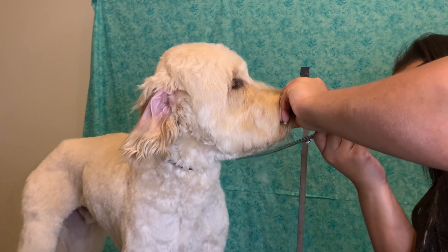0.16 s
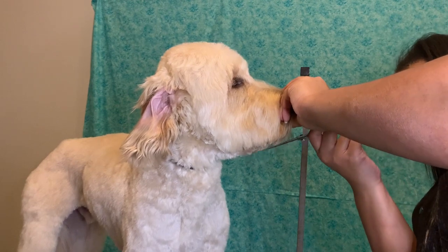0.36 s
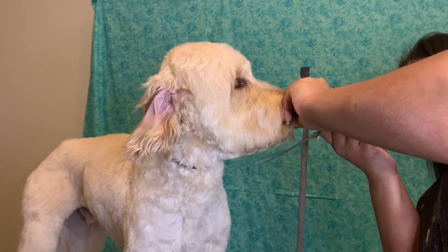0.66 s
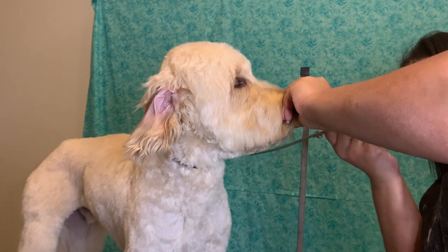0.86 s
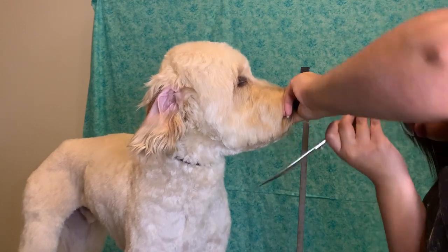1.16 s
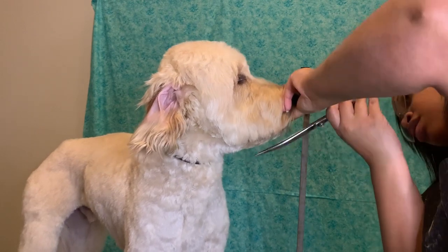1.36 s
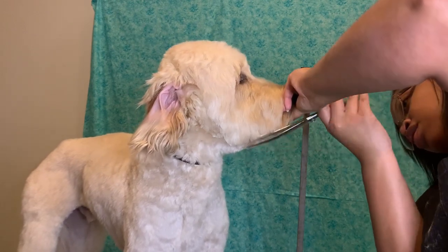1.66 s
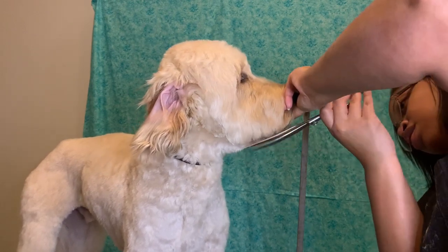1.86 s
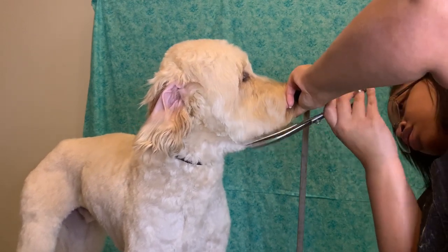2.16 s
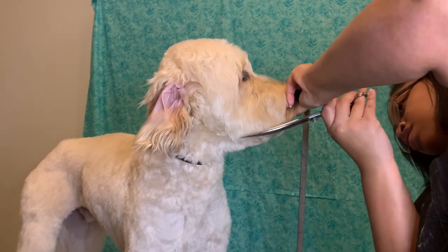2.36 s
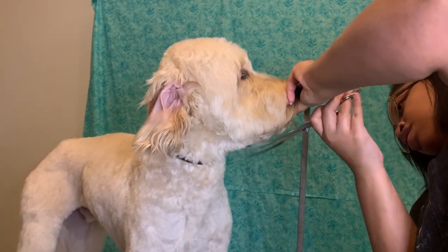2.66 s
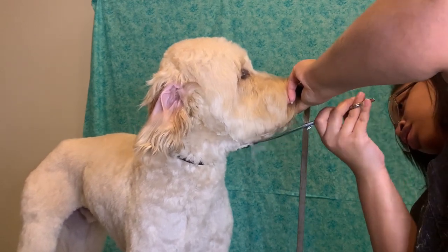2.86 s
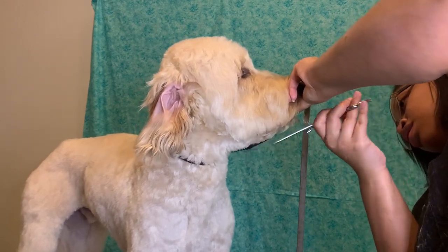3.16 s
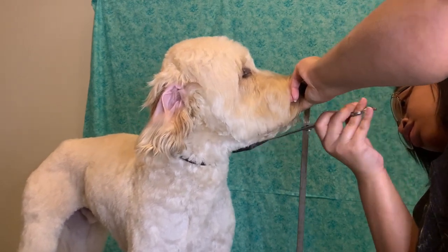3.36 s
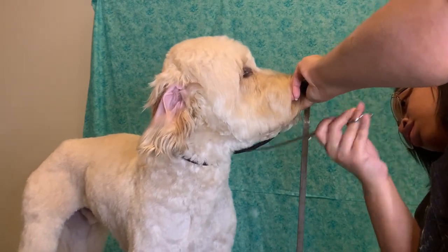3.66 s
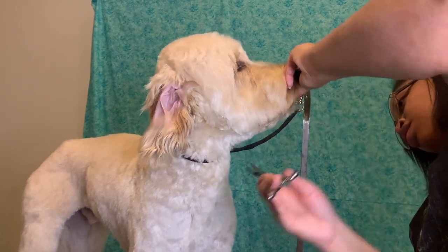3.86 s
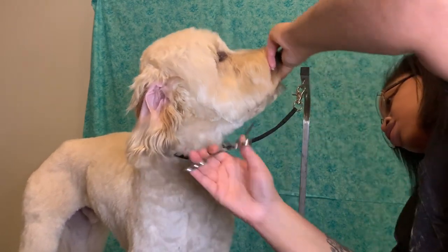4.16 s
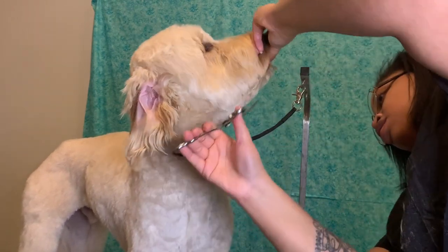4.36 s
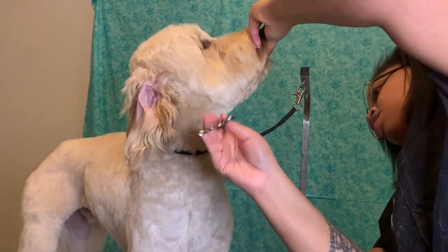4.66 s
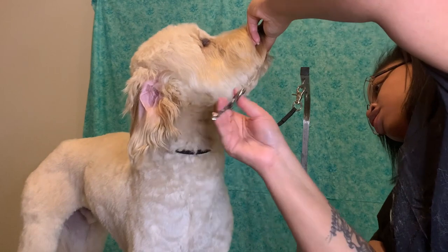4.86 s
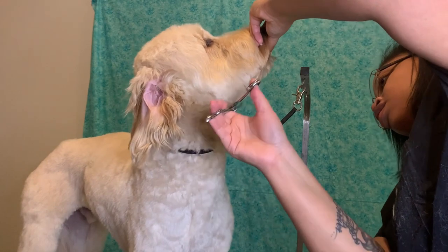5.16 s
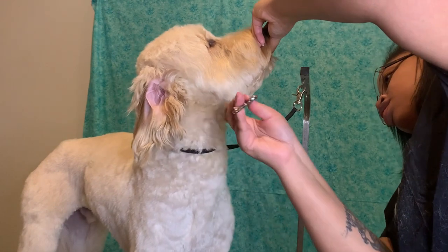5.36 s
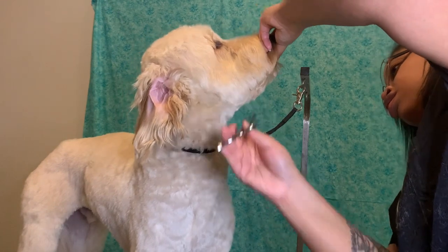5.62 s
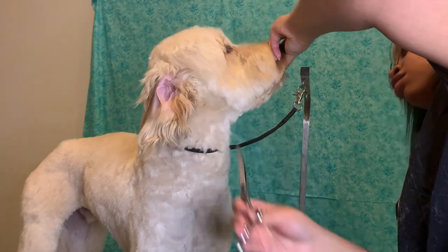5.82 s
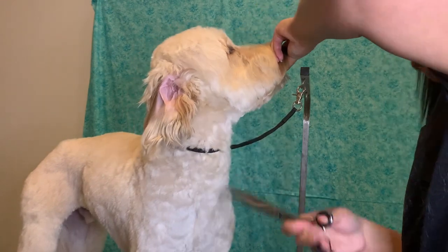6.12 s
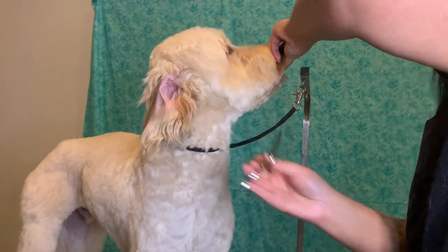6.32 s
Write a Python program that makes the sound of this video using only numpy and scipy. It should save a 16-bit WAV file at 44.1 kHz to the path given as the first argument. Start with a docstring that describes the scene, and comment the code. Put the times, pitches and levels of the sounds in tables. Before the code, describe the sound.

Close stereo sound of steel grooming shears cutting a dog's hair in a small, hard-walled room with a short bright reverb. Crisp snips with ringing clacks land at about 0.1 and 0.4 seconds, followed by lighter, dry ticking cuts and a softer closure near 0.8. Fine scratchy clips continue through 1.5, then firmer snips at 1.7, 2.0 and 2.5. Tiny pivot squeaks flick by near 2.8 and 3.3, around hard snips at 3.0 and 3.5. At 4.0 a sharp clip meets a soft rustle of hand against fur. The strongest, brightest snips ring at 4.5 and 4.9, with a weaker one at 5.3. Afterwards only sparse faint clicks remain, with light fur brushing around 5.8 to 6.0 and again near 6.45. Quiet low rumble, bassy ventilation and a faint wavering hum lie underneath throughout.

```python
"""Steel grooming shears work along a dog's chin and throat in a small hard-walled room.
Hair snapping between the blades excites their resonances; the handles clack shut as impacts ring the tool;
the pivot squeals by stick-slip. Shaped noise gives the hand in the coat, a low rumble and ventilation, with a hum.
Reflections and decaying diffuse sound answer; two close ports differ in phase, which combs the treble of their sum."""
import sys
import numpy as np
from scipy import signal
from scipy.fft import rfft, irfft, next_fast_len
from scipy.io import wavfile

SR = 44100
rng = np.random.default_rng(int(sys.argv[2]) if len(sys.argv) > 2 else 0)


def wrap_up_sound(samples):
    """Save the sound to the file named by the first command line argument, as 16-bit audio."""
    columns = np.atleast_2d(samples).T
    # keep every value between -1 and 1, then stretch to whole-number steps
    tamed = np.clip(columns, -1, 1)
    steps = np.round(tamed * 32767).astype(np.int16)
    wavfile.write(sys.argv[1], SR, steps)


N = 286209
SIZE = next_fast_len(N + SR)   # transform length with space for the room's decay
HZ = np.arange(1, SIZE // 2 + 2) * SR / SIZE   # bin frequencies, one bin up so that log f exists

# Resonances along the shears, from the handle side to the point: f/Hz, width/Hz, level/dB
HEEL_MODES = [(1502, 516, -7), (2133, 510, 10.5), (2163, 820, 6.5)]
SHANK_MODES = [(3740, 1000, -4.5), (4220, 1200, -5.5)]
BELLY_MODES = [(5100, 140, -11), (6242, 750, -4), (7110, 656, -1)]
EDGE_MODES = [(8257, 1240, -7), (8447, 752, 3.5), (9080, 2300, -1), (10760, 2310, -2), (11870, 670, -6)]
TIP_MODES = [(12800, 610, -0.91), (14450, 1700, -0.65), (14160, 1200, 0.96)]


def from_db(db):
    """Level and amplitude: 20 dB is a tenfold gain."""
    return 10 ** (np.asarray(db) / 20)


def rms_one(x):
    """Normalisation of mean power: scale to rms 1."""
    return x / np.sqrt(np.mean(x ** 2) + 1e-20)


def at_hz(points):
    """Interpolation on a log-frequency axis: a table read at every spectral bin."""
    hz, value = np.array(points)[:, 0], np.array(points)[:, 1]
    return np.interp(np.log(HZ), np.log(hz + 1), value)


def resonate(x, modes):
    """Modal superposition: parallel two-pole resonances of alternating sign."""
    out = 0
    for k, (hz, width_hz, level_db) in enumerate(modes):
        r = np.exp(-np.pi * width_hz / SR)   # pole radius sets the bandwidth
        zeros = [(1 - r * r) / 2, 0, (r * r - 1) / 2]
        poles = [1, -2 * r * np.cos(2 * np.pi * hz / SR), r * r]
        mode = signal.lfilter(zeros, poles, x + 1e-18)
        out = out + (-1) ** k * from_db(level_db) * mode
    return out


def grit(per_s, spread_db):
    """Shot noise: dense random ticks of uneven size and either sign; rms 1."""
    size_db = spread_db * np.minimum(rng.exponential(1, N), 4)
    sizes = from_db(size_db) * rng.choice([-1, 1], N)
    return rms_one(sizes * (rng.random(N) < per_s / SR))


def coloured(spectrum):
    """Spectral shaping: two unrelated noises of one colour; rms 1."""
    white = rfft(rng.standard_normal((2, SIZE)))
    return rms_one(irfft(white * from_db(at_hz(spectrum)), SIZE)[:, :N])


def swells(rows, rise_db_per_s, fall_db_per_s):
    """Exponential growth and decay: each row (full at s, hold s, dB) rises, holds and falls; gains add."""
    t, total = np.arange(N) / SR, 0
    for s, hold, db in rows:
        rise_db = rise_db_per_s * np.maximum(s - t, 0)
        fall_db = fall_db_per_s * np.maximum(t - s - hold, 0)
        total = total + from_db(db - rise_db - fall_db)
    return total


def drift(corner_hz):
    """Low-pass random process: slow chance of spread 1, drawn every 100 samples and interpolated."""
    r = np.exp(-200 * np.pi * corner_hz / SR)
    white = rng.standard_normal(N // 100 + 1002)
    slow = signal.lfilter([1], [1, -2 * r, r * r], white)[1000:]   # drop the filter's start
    return np.interp(np.arange(N) / 100, np.arange(len(slow)), rms_one(slow - slow.mean()))


def hum():
    """Narrow-band noise: one sharp resonance driven at random gives a tone that wavers."""
    hz, width_hz, level_db = 58.7, 2.7, -61.5
    return from_db(level_db) * rms_one(resonate(rng.standard_normal(N), [(hz, width_hz, 0)]))


def ventilation():
    """Stationary broadband noise with most of its energy in the bass."""
    # Relative spectral density of the air noise: f/Hz, level/dB
    air_spectrum = [(20, -55), (33, -20.5), (45, 4), (75, 0.5), (100, -10.5), (160, -16.5), (300, -29.5),
                    (600, -32), (1300, -42.5), (2500, -43), (5000, -46.5), (9000, -39), (16000, -46.5)]
    return from_db(-58) * coloured(air_spectrum)


def rumble():
    """Amplitude-modulated low noise: a slow level course plus a random waver."""
    # Relative spectral density of the rumble: f/Hz, level/dB
    rumble_spectrum = [(40, -21.5), (90, 8), (200, -5), (350, -11.5), (700, -29), (16000, -80)]
    # Slow course of the rumble: t/s, level/dB
    level_course = [(0, -66), (1.2, -65.5), (1.9, -70.5), (3.4, -69.5), (5.002, -66.5), (6.49, -71)]
    waver_db, waver_corner_hz = 3.5, 7.4
    level_db = np.interp(np.arange(N) / SR, *np.transpose(level_course))
    level_db = level_db + waver_db * drift(waver_corner_hz)
    return from_db(level_db) * coloured(rumble_spectrum)


def rustle():
    """Friction noise: hand and arm sweep through the coat, many small contacts merging into noise."""
    # Sweeps through the coat: full at t/s, hold/s, level/dB
    sweeps = [(0, 0.017, -75.5), (1.15, 0.086, -71.5), (2.14, .03, -75), (4.02, .2, -63.5),
              (5.78, 0.29, -71), (6.33, .05, -74), (6.45, 0.038, -64)]
    # Relative spectral density of the brushed fur: f/Hz, level/dB
    fur_spectrum = [(150, -14.5), (500, -0.5), (1000, -0.5), (2500, -1), (5000, -11), (16000, -41.5)]
    return swells(sweeps, rise_db_per_s=155, fall_db_per_s=91.5) * coloured(fur_spectrum)


def squeal():
    """Stick-slip: the pivot, loaded by slowly closing blades, ticks into one narrow resonance."""
    # Moments of greatest load: t/s, peak level/dB
    loads = [(2.819, -42), (3.335, -43)]
    # Resonance of the pivot: f/Hz, width/Hz, level/dB
    pivot_mode = [(8950, 400, 0)]
    load = swells([(s, 0, db) for s, db in loads], rise_db_per_s=1798, fall_db_per_s=317.5)
    ticks = grit(400., spread_db=0.5)
    return load * rms_one(resonate(resonate(ticks, pivot_mode), pivot_mode))


def clacks():
    """Impulse response: a hard blow and three quick rebounds ring the tool, knock in the hand, thud in the table."""
    # Handles meeting their stop: t/s, blow drive level/dB,
    # then drives against it: bright ring/dB, dull knock/dB, sharp knock/dB, thud/dB
    impacts = [(0.0974, -26, 9.5, -12.5, -25, -23), (0.366, -48.5, -5, -9, -14, -14),
               (0.4122, -25, 9, -16, -14.5, -27), (0.8362, -37.5, 2, -10, -13, -12.5),
               (1.6955, -61.5, 19, -23, -20, -25), (2.0354, -30.5, 4, -10.5, -13, -14.5),
               (2.51, -49.5, 13.5, -15, -34, -17.5), (2.7892, -47.5, -3, -12, -11, -30),
               (2.9809, -29.5, 10, -11, -8.5, -15), (3.4838, -24, 6.5, -13.5, -11.5, -16.5),
               (4.0024, -52.5, 26, -13, -20, -30), (4.514, -29.5, 11.5, -18, -10.5, -15.5),
               (4.8561, -40.5, -1, -26, -9.5, -17), (4.9121, -26.5, 8, -21, -13.5, -14.5),
               (5.2772, -61, 2, -21, 3.5, -25)]
    # Resonances of the hand (first dull, then sharp) and of the table: f/Hz, width/Hz, level/dB
    knock_modes = [(306, 240, 2), (806, 990, -1), (1140, 340, -7.5)]
    thud_modes = [(180, 32, 0.033)]
    blows, lows = np.zeros((2, N)), np.zeros((3, N))
    luck = rng.random((len(impacts), 6))
    for (s, blow_db, bright_db, *low_db), row in zip(impacts, luck):
        gaps = np.r_[0, row[:3] * .002 * SR + 9]   # samples between rebounds
        at = round(s * SR) + np.cumsum(gaps).astype(int)
        rebound_db = np.r_[0, -9 - 9 * row[3:]]
        blows[:, at] += from_db(blow_db + np.c_[[0, bright_db]] + rebound_db) * [1, -1, 1, -1]
        lows[:, at[0]] += from_db(blow_db + np.array(low_db))
    heel_ring = from_db(26.5) * resonate(blows[0], HEEL_MODES)
    bright_ring = from_db(21) * resonate(blows[1], SHANK_MODES + BELLY_MODES + EDGE_MODES + TIP_MODES)
    knock = resonate(lows[0], knock_modes[:1]) - resonate(lows[1], knock_modes[1:])
    thud = resonate(lows[2], thud_modes)
    return heel_ring + bright_ring + from_db(30) * knock + from_db(41) * thud


def strokes():
    """Source and resonator: hair after hair snaps between the edges, and the ticks ring each part of the blade."""
    # Blades biting hair: hardest bite at t/s, drive level/dB, lead-in/s, fade t60/s (at least 5 ms),
    # then drives against it: heel/dB, tip/dB
    bites = [(0.1, -18, 0.022, 0.1, -31.5, -3), (0.227, -31, 0.0054, 0.2, -26.5, -1),
             (.31, -36.5, 0.003, 0.048, -28.5, 0), (0.363, -34, 0.019, 0.068, -27.5, -2.5),
             (0.415, -16, 0.023, 0.062, -40, -4), (0.55, -29.5, 0.0077, 0.079, -30, -4),
             (.624, -35.5, 0.0031, 0.27, -25.5, -1.5), (.763, -42.5, 0.0053, 0.046, -28, -3),
             (0.812, -32, 0.031, 0.072, -26, -1), (.836, -24, .004, 0.035, -40, 0.5),
             (.908, -35, .004, 0.21, -33, -1), (0.955, -35, 0.013, 0.097, -29.5, -1),
             (1.05, -38.5, 0.0055, .15, -28, 1), (1.09, -34, 0.0065, 0.093, -32, -4),
             (1.153, -42, .005, 0.54, -26, 1), (1.23, -29.5, 0.0099, 0.037, -42, -7),
             (1.311, -34.5, 0.0069, .11, -33, -1), (1.366, -32.5, 0.0046, 0.052, -30, -4),
             (1.438, -34.5, 0.0073, 0.17, -25.5, -2), (1.696, -21, 0.034, 0.016, -39.5, -5),
             (1.852, -38.5, 0.0092, 0.2, -27.5, 2), (1.947, -41.5, 0.0026, 0.031, -23, -5),
             (2.003, -33.5, .022, 0.11, -22.5, -7), (2.016, -32.5, 0.0055, 0.015, -26, 3),
             (2.035, -18, 0.0046, 0.022, -45, -1.5), (2.142, -35.5, 0.0032, 0.087, -30, 2.5),
             (2.172, -31, 0.0068, 0.056, -23, -4), (2.316, -25.5, 0.06, 0.041, -31, -2.5),
             (2.447, -37.5, 0.0023, .059, -52, 3), (2.463, -35.5, 0.0032, 0.053, -21.5, -13),
             (2.508, -23, 0.0068, 0.04, -57, -1), (2.603, -36, .003, 0.035, -37, 4.5),
             (2.624, -31.5, 0.0032, 0.079, -26, -10), (2.739, -38.5, 0.0044, 0.043, -36, -9),
             (2.79, -35.5, 0.016, 0.084, -15, -2), (2.819, -34.5, 0.0028, 0.061, -20.5, -8),
             (2.862, -27.5, 0.0015, 0.009, -33, -5), (2.983, -18.5, 0.019, 0.025, -33.5, -2.5),
             (3.144, -32.5, 0.006, .19, -26.5, 0.5), (3.268, -36.5, 0.0033, .025, -33, -1),
             (3.307, -32.5, 0.02, 0.051, -30.5, -8), (3.33, -37.5, 0.015, 0.11, -22.5, 2.5),
             (3.366, -40, 0.0021, 0.037, -16.5, -5), (3.488, -12, 0.015, 0.012, -30.5, -2.5),
             (3.678, -35.5, 0.0062, 0.19, -22.5, 0.5), (3.737, -41, 0.005, 0.12, -21, -10),
             (3.819, -42.5, 0.011, 0.17, -25.5, -4), (3.876, -33, 0.0074, 0.053, -22.5, -6),
             (3.892, -37.5, .015, 0.017, -52, 0), (3.927, -32, 0.0031, .18, -27, -2),
             (4, -15, 0.0081, 0.023, -50, -8.5), (4.128, -31, 0.0025, 0.072, -24, 1.5),
             (4.49, -42, 0.022, 0.056, -16.5, 1), (4.515, -9.5, 0.014, 0.011, -27.5, -6.5),
             (4.694, -32, 0.0034, 0.1, -26.5, -6), (4.793, -48, .003, 0.018, -23, -2),
             (4.857, -25.5, 0.015, 0.086, -31, -8.5), (4.886, -36, 0.0037, .074, -15, 9),
             (4.912, -9, .006, 0.015, -29, -9.5), (5.036, -29.5, 0.0035, 0.14, -28.5, -1.5),
             (5.224, -39.5, .002, 0.023, -25.5, -1), (5.276, -23.5, .025, 0.033, -39, 1),
             (5.445, -49, .003, .025, -46, -7), (5.5, -43, .002, 0.03, -37, -3),
             (5.567, -47, .01, 0.021, -53.5, -14), (5.599, -28, 0.0037, 0.061, -32, -2.5),
             (5.714, -40, .006, 0.039, -24, -7), (6.081, -33.5, 0.0046, 0.031, -42.5, -1),
             (6.138, -28.5, 0.0039, 0.02, -38, 3), (6.153, -34.5, 0.007, 0.061, -26.5, -15),
             (6.332, -35.5, 0.0086, 0.18, -22, -0.5), (6.402, -35, 0.0043, 0.1, -26.5, -6),
             (6.42, -27.5, 0.019, 0.011, -30, -3)]
    rise_db_per_s, rise_grows, usual_bite_db = 998.5, 0.33, -23   # growth: dB of pace per dB of drive
    touch_share = 0.32   # part of the lead-in over which the edges first come into touch
    t, drive = np.arange(N) / SR, np.zeros((5, N))
    tint_db = 1.64 * rng.standard_normal((len(bites), 2))   # the contact point favours shank or belly
    for (s, bite_db, lead, t60, heel_db, tip_db), tint in zip(bites, tint_db):
        near = slice(int((s - max(lead, 1 / 1000)) * SR), int((s + .4) * SR))
        age = t[near] - s
        shank_db = 12 + 0.73 * heel_db   # the shank partly follows the heel
        belly_db = shank_db + 2
        part_db = np.c_[[heel_db, shank_db + tint[0], belly_db + tint[1], 0, tip_db]]
        pace = rise_db_per_s * from_db(rise_grows * (bite_db - usual_bite_db))   # harder bites grow faster
        course_db = np.where(age < 0, pace * age, -60 * age / max(t60, 1 / 200))
        touch = np.clip((age + lead) / (touch_share * lead + 1e-9), 0, 1)
        drive[:, near] += from_db(bite_db + part_db + course_db) * touch
    ticks = drive * [grit(2500., spread_db=4.5) for part in drive]
    # (modes, radiation dB), in the order of the drives
    parts = [(HEEL_MODES, 9.), (SHANK_MODES, 1.), (BELLY_MODES, 1.), (EDGE_MODES, 3.), (TIP_MODES, 4.5)]
    return sum(from_db(out_db) * resonate(tick, modes) for tick, (modes, out_db) in zip(ticks, parts))


def echoes(x):
    """Specular reflection: the table's echo feeds both ports alike, the wall's feeds them with opposite sign."""
    # Table top, then near wall: delay/s, level/dB
    reflections = [(.0078, -9.5), (0.0104, -6)]
    rows = []
    for delay_s, level_db in reflections:
        delayed = np.r_[np.zeros(round(delay_s * SR)), x][:N]
        rows.append(from_db(level_db) * delayed)
    return np.array(rows)


def tails():
    """Exponential reverberation: two diffuse noises build up, then die away at each band's own rate."""
    # Reverberation time of the room: f/Hz, t60/s
    decay_times = [(150, 0.94), (600, 0.74), (1500, 0.49), (4000, 0.56), (10000, 0.25), (16000, 0.26)]
    t = np.arange(SR * 2 // 3) / SR
    edges = 100 * 2 ** np.arange(0, 7.6, .75)   # band edges in Hz, three quarters of an octave apart
    white, tail = rng.standard_normal((2, len(t))), 0
    hz, t60_s = np.transpose(decay_times)
    for low, high in zip(edges, edges[1:]):
        t60 = np.interp(np.log(low * high) / 2, np.log(hz), t60_s)
        band = signal.butter(2, [low, high], "band", fs=SR, output="sos")
        tail = tail + signal.sosfilt(band, white) * from_db(-60 * t / t60)
    tail = tail * np.clip(t / 0.026, 0, 1)
    return tail / np.sqrt(np.sum(tail ** 2) / 2)


def room(x, count=7):
    """Convolution with the room: the moving shears excite it from a few places in turn."""
    move_s, level_db = .47, -5
    place = (np.arange(N) / SR / move_s).astype(int) % count
    wet = sum(rfft(x * (place == k), SIZE) * rfft(tails(), SIZE) for k in range(count))
    return from_db(level_db) * irfft(wet, SIZE)[:, :N]


def ports(direct, diffuse):
    """Coherence and path difference: shared direct, partly shared diffuse sound; the left treble lags."""
    # Coherence of the diffuse sound between the ports: f/Hz, share/1
    coherence = [(60, 0.94), (150, 0.95), (350, 0.52), (700, .2), (2000, 0.47), (4700, 0.53), (7000, 0.56),
                 (9300, 0.83), (14000, 1), (16000, .93)]
    # Level of the left port against the right: f/Hz, level/dB
    balance = [(100, 0.8), (400, 0.5), (1400, 1), (4000, -2), (9000, 0), (16000, 0)]
    # Phase by which the left port trails, apart from the path lag: f/Hz, phase/rad
    phase_lag = [(500, 0.017), (1400, 1), (2600, 0.94), (4000, 1), (4700, 0.0034)]
    path_lag_s = 1 / 4670   # this path difference combs the treble of the sum
    alike, sides = np.clip(at_hz(coherence), 0, 1), np.array([[1], [-1]])
    common, apart = rfft(diffuse, SIZE)
    shared = rfft(direct, SIZE) + np.sqrt((1 + alike) / 2) * common
    spectrum = shared + np.sqrt((1 - alike) / 2) * apart * sides
    # half the phase difference goes to each port; the path counts above its first full turn
    late = np.pi * np.maximum(HZ * path_lag_s - 1, 0) + at_hz(phase_lag) / 2
    gain = from_db(sides * at_hz(balance) / 2)
    return irfft(spectrum * np.exp(-1j * sides * late) * gain, SIZE)[:, :N]


def scene():
    """Superposition: shears with their reflections, over rustle, rumble, ventilation and hum."""
    shears = strokes() + clacks() + squeal()
    background = rustle() + rumble() + ventilation()
    diffuse = echoes(shears) + room(shears) + background
    return ports(shears + hum(), diffuse)


def record(dry):
    """Band limiting: the response drops off a step at the ports' upper edge; the top is cut steeply."""
    port_edge_hz, cutoff_hz = 15750, 16650
    dry = signal.sosfilt(signal.ellip(8, 1, 32, port_edge_hz, fs=SR, output="sos"), dry)
    return signal.sosfilt(signal.cheby2(12, 50, cutoff_hz, fs=SR, output="sos"), dry)


dry = scene()
out = record(dry)
wrap_up_sound(out)
```